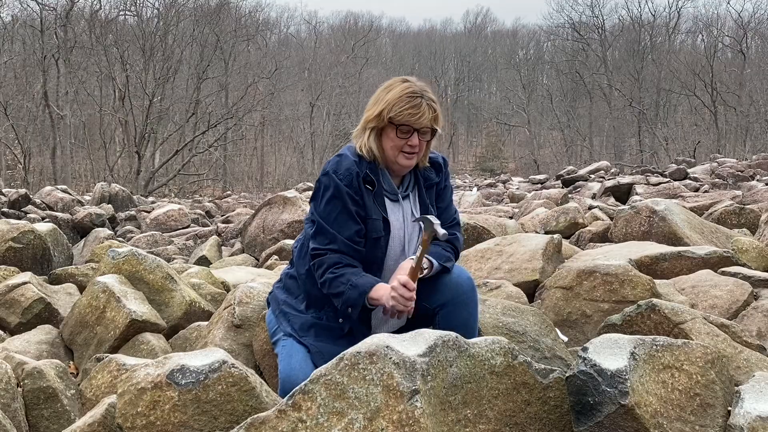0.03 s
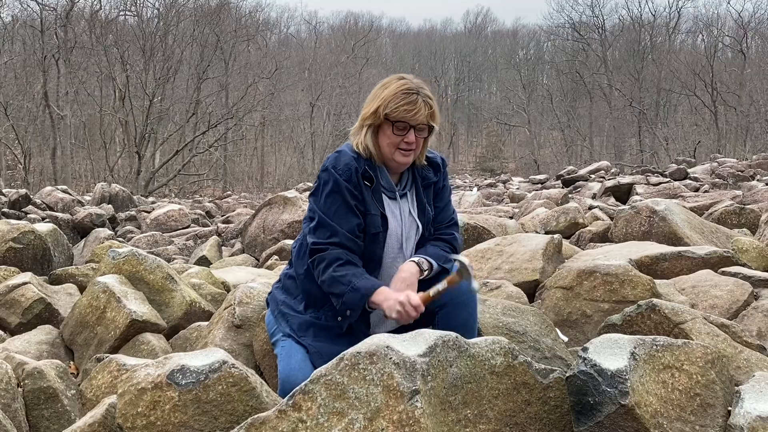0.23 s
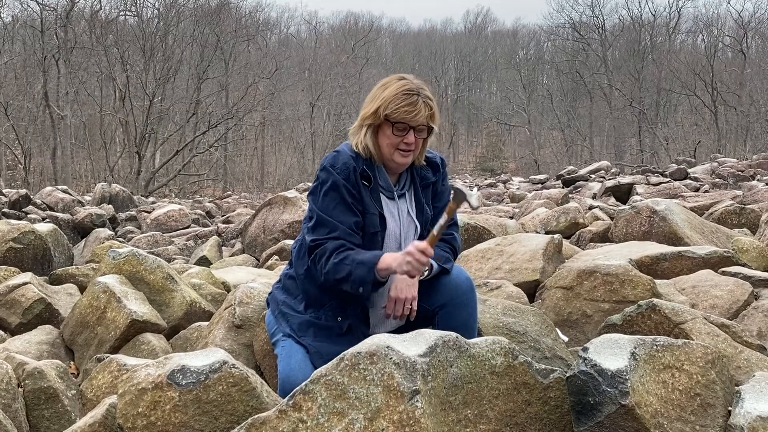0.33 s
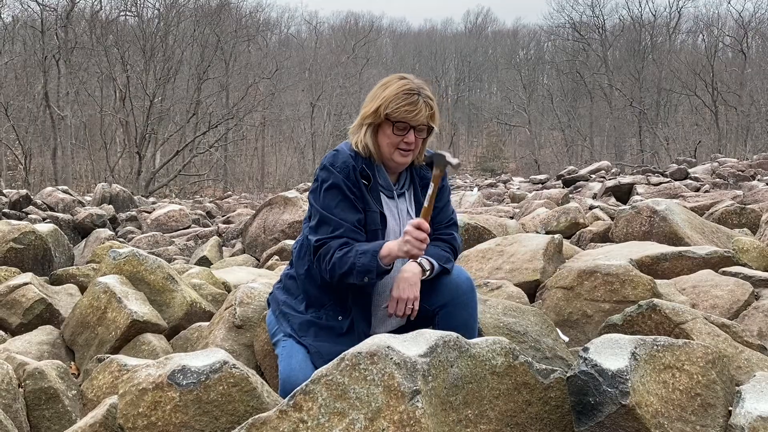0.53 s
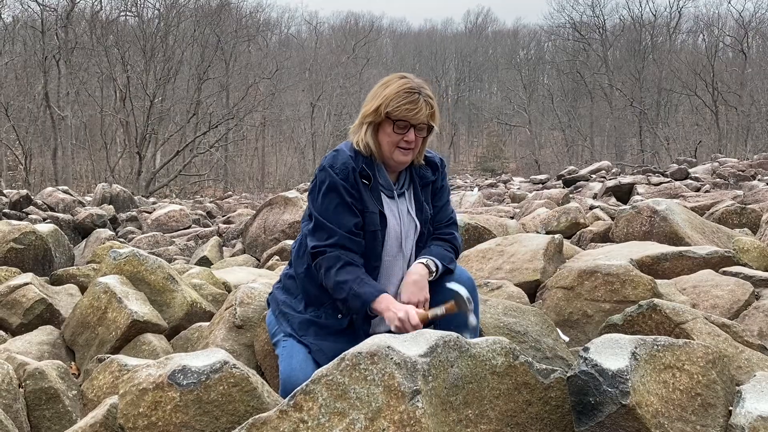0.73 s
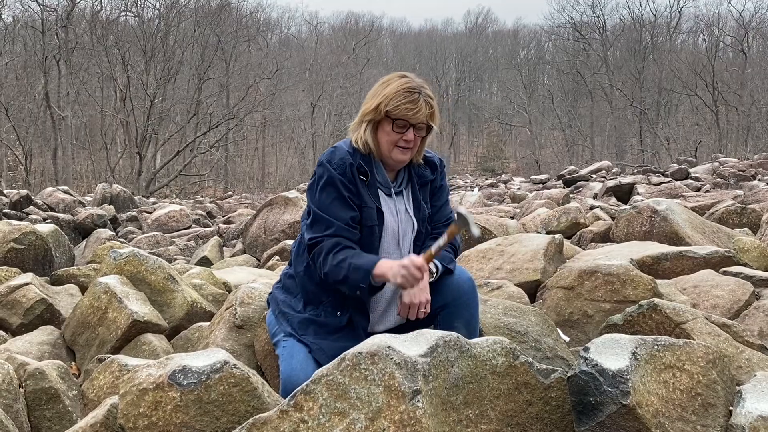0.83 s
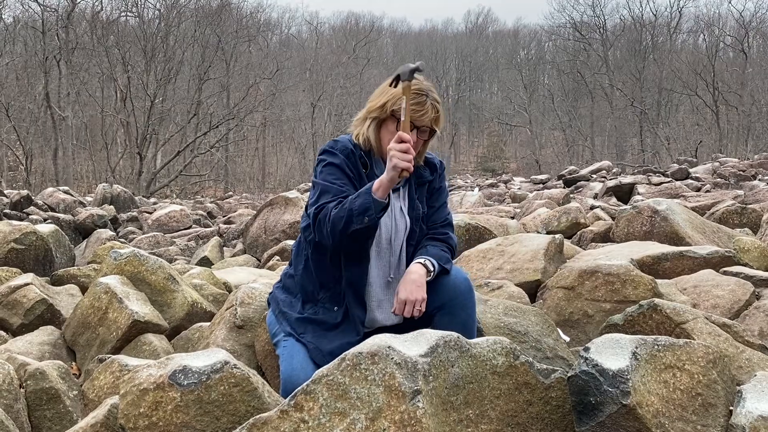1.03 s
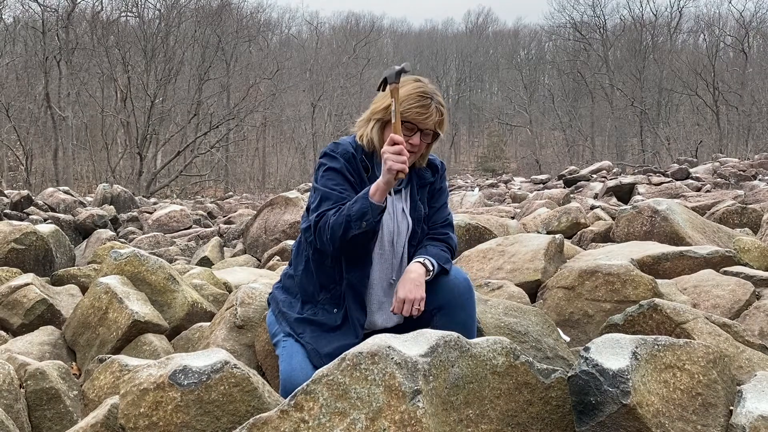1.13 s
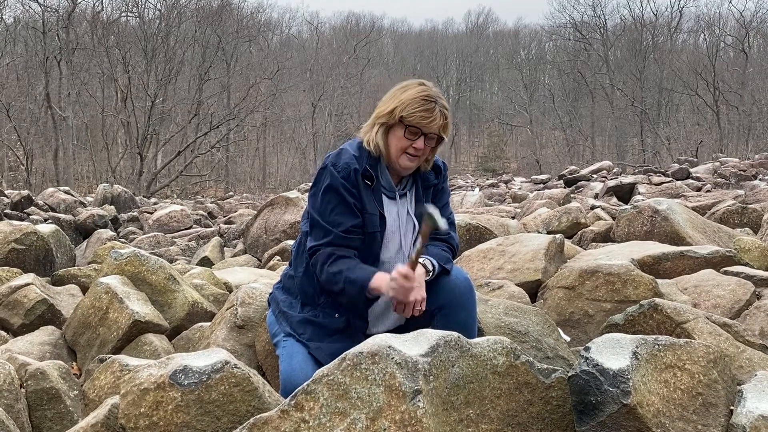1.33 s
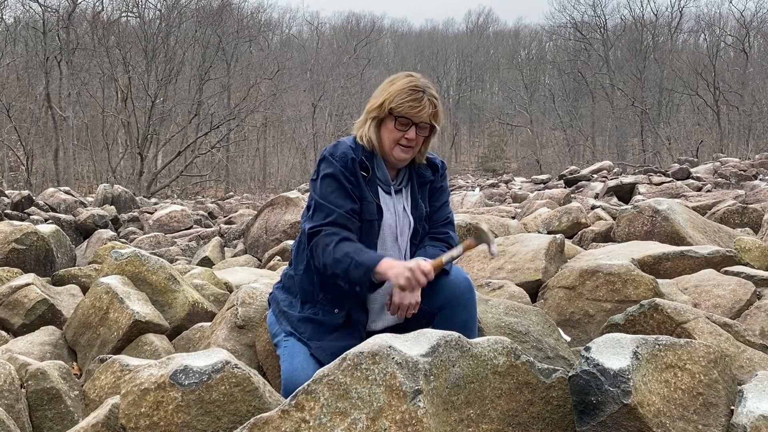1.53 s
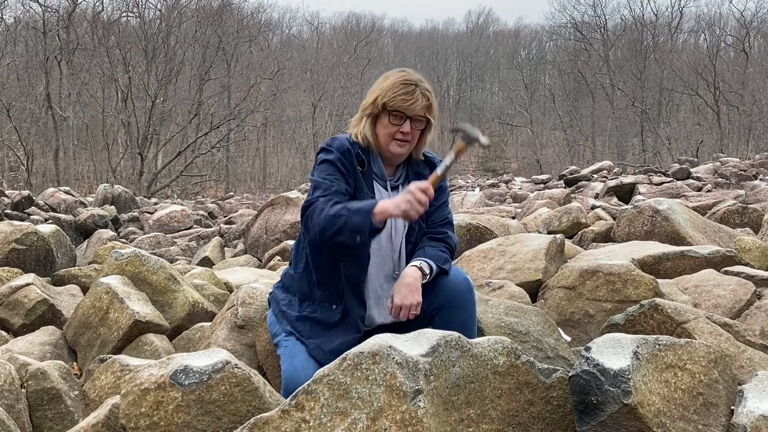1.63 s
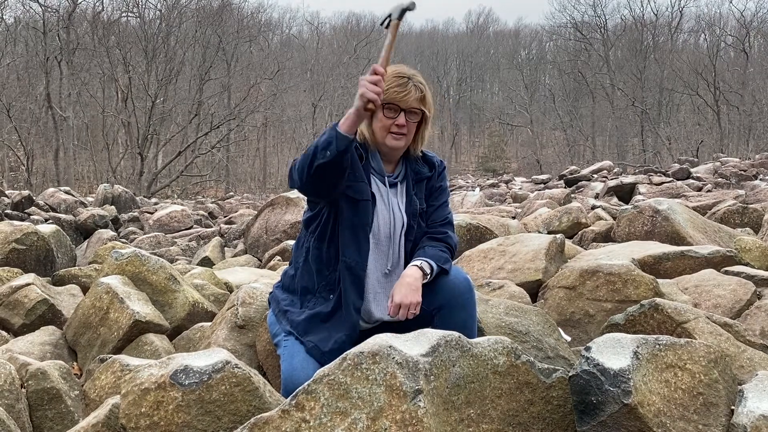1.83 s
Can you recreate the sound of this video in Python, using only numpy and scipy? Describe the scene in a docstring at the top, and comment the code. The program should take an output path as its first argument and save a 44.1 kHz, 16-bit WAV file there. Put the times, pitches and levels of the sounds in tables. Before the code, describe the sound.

A steel hammer strikes a boulder at about 0.2, 0.7 and 1.4 seconds, after the fading ring of an earlier blow. Each hit is a sharp crack with a dull knock and short, high bell-like tones from the rock. The hammer head rings on thinly, bending slightly in pitch. A faint echo returns across the open field over a soft, low rumble of air.

```python
"""Hammer on a ringing boulder

An open field of rocks, a stereo microphone a few metres from a steel hammer striking a boulder.
Each blow cracks, thuds, scatters among the stones and sets the boulder's short bell tones going.
The hammer head sings on as it is lifted and brought down, its motion bending the pitch.
The trees send back a faint echo over a low rumble of air."""
import sys
import numpy as np
from scipy import signal
from scipy.fft import rfft, irfft
from scipy.io import wavfile

SR = 44100
rng = np.random.default_rng(int(sys.argv[2]) if len(sys.argv) > 2 else 0)


def generate_wav(signal):
    """Clip the signal to [-1, 1] and save it as 16-bit WAV at the path in sys.argv[1]."""
    frames = np.transpose(np.atleast_2d(signal))
    scaled = np.clip(frames, -1, 1) * 32767
    pcm = np.round(scaled).astype(np.int16)
    wavfile.write(sys.argv[1], SR, pcm)


N = 83790

# The boulder's modes: pitch_hz, t60_s, spot_a_db, spot_b_db, spot_c_db
BOULDER_MODES = [(770, .045, -22, -24, -23), (1769, .23, -27, -25, -23), (2572, .28, -30, -38, -21),
                 (2742, .31, -40, -42, -34), (3128, .36, -42, -44, -40), (3816, .175, -20, -21, -19),
                 (3983, .25, -23, -22, -19), (4294, .29, -31, -26, -27), (4470, .14, -24, -24, -20),
                 (4922, .32, -29, -26, -26), (5074, .16, -18, -16, -19), (5160, .20, -24, -22, -21),
                 (5423, .13, -34, -39, -27), (5523, .26, -44, -40, -43), (6296, .10, -27, -33, -22),
                 (6557, .16, -40, -33, -45), (6755, .06, -28, -29, -22), (7058, .13, -42, -47, -34)]
def boulder(t, spot):
    """Bell tones of the rock; their balance depends on the spot that is struck."""
    phases = 2 * np.pi * rng.random(len(BOULDER_MODES))
    return sum(amp(spots_db["ABC".index(spot)]) * fade(t, t60) * np.sin(2 * np.pi * hz * t + phase)
               for (hz, t60, *spots_db), phase in zip(BOULDER_MODES, phases))


# Colour of steel on stone: frequency_hz, relative_db
CRACK_SPECTRUM = [(130, -25.5), (500, -12), (820, -2.5), (1150, -7.5), (2200, 0.5), (3300, -1), (4700, 3.5),
                  (6400, 3.5), (8200, -10), (10500, -8.5), (12100, -31), (13400, -10.5), (14900, -13.5),
                  (16000, -22)]
# Decay of its bands: centre_hz, t60_s
CRACK_BANDS = [(400, 0.079), (1000, .028), (5000, 0.036), (15000, 0.061)]
# Its left-right likeness at the microphone: frequency_hz, correlation
CRACK_LIKENESS = [(200, 0.99), (1000, .93), (2500, 0.75), (6000, 1), (13000, .6)]
def crack(t, rise_s=.00033, hold_s=.0035):
    """The burst of the contact holds for a moment, then each band dies at its own speed."""
    hz = np.fft.rfftfreq(N, 1 / SR)
    spectrum = rfft(noise(CRACK_SPECTRUM, CRACK_LIKENESS))
    burst = 0
    for centre_hz, t60 in CRACK_BANDS:
        band = read([(f, f == centre_hz) for f, _ in CRACK_BANDS], hz)
        burst += irfft(spectrum * band, N) * fade(np.maximum(t - hold_s, 0), t60)
    return amp(-14) * np.minimum(t / rise_s, 1) * burst


# The steel head's modes: pitch_hz
HEAD_PITCHES = [4768, 4768, 7308, 8851, 14750]
# The same modes and their reflections: name, base_t60_s, shimmer_db, shimmer_t60_s, flutter_hz
HEAD_MODES = [("clang", 0.051, -29, .12, 40), ("low", 0.57, -1, 0.87, 26), ("high", 3.34, -4.5, 2, 34),
              ("ping", 0.13, -17.5, 0.43, 17), ("top", .25, -2, .33, 35)]
# The swing after each blow; the grip scales the ring time, and two tones swell as they face the
# microphone: lift_s, grip_factor, high_facing_s, low_facing_s, low_width_s, low_swell_db
HAMMER_SWINGS = [(.14, 1.8, 0.17, .2, .06, -2.5), (0.161, 1.26, .23, 0.19, 0.21, 11),
                 (.24, 1.12, .21, .225, .055, 18), (0.342, 0.76, 0.23, .27, .1, 7.5)]
def hammer(t, swing, levels_db):
    """The head rings flat moving away and sharp coming down; its reflections shimmer among the stones."""
    lift_s, grip, high_facing_s, low_facing_s, low_width_s, low_swell_db = swing
    lift_m_per_s, top_m_per_s, drop_m_per_s2, sound_m_per_s = .6, 1.6, 6.5, 343
    approach = np.where(t < lift_s, -lift_m_per_s * t / lift_s,
                        drop_m_per_s2 * (t - lift_s) - lift_m_per_s)
    doppler_s = np.cumsum(1 + np.minimum(approach, top_m_per_s) / sound_m_per_s) / SR
    facing_db = {"low": low_swell_db * np.exp(-((t - low_facing_s) / low_width_s) ** 2),
                 "high": 9.5 * np.exp(-((t - high_facing_s) / .034) ** 2)}
    away_db = 37.5 * np.maximum(t - .28 * grip, 0)  # the raised head turns from the microphone
    tones = 0
    for hz, mode, level_db in zip(HEAD_PITCHES, HEAD_MODES, levels_db):
        name, t60, shimmer_db, shimmer_t60, flutter_hz = mode
        direct = amp(facing_db.get(name, 0) - away_db) * fade(t, t60 * grip)
        shimmer = amp(shimmer_db) * fade(t, shimmer_t60) * flutter(flutter_hz)
        tones += amp(level_db) * ((direct + shimmer) * np.exp(2j * np.pi * hz * doppler_s)).imag
    return tones


# Low modes of the boulder on its bed: pitch_hz, t60_s, level_db
THUD_MODES = [(112, .12, -47), (164, .11, -37.5), (191.5, 0.17, -41), (269, 0.079, -35.5),
              (389, 0.027, -45)]
def thud(t, rise_cycles=1.8):
    """The boulder's dull knock on its bed; the deeper a mode, the later it builds up."""
    return sum(amp(db) * bloom(t, rise_cycles / hz, t60) * np.sin(2 * np.pi * hz * t)
               for hz, t60, db in THUD_MODES)


# Reflections off the nearby stones: frequency_hz, relative_db
STONE_SPECTRUM = [(150, 4.5), (500, -10.5), (1300, -7.5), (2300, 1.5), (4500, 4), (6400, 3), (8200, -14),
                  (10300, -2.5), (12200, -26.5), (14500, -13), (16500, -33.5)]
# Reflections off the trees: frequency_hz, relative_db
TREE_SPECTRUM = [(300, -15), (1250, -3), (2300, 9), (3300, -0.5), (4600, 3.5), (5600, -9), (6400, 11),
                 (7400, -1.5), (8000, -27.5), (10000, -15), (12000, -35.5)]
# Left-right likeness of diffuse sound at the microphone: frequency_hz, correlation
DIFFUSE_LIKENESS = [(50, 1), (300, 0.92), (900, .55), (2300, 0.74), (5000, 0.72), (15000, .5)]
def crack_echo(t):
    """The crack scatters among the stones close by, then returns from the trees farther off."""
    stones = amp(-32.5) * noise(STONE_SPECTRUM, DIFFUSE_LIKENESS) * bloom(t, rise_s=.004, t60=.23)
    trees = amp(-59) * noise(TREE_SPECTRUM, DIFFUSE_LIKENESS) * bloom(t, rise_s=.18, t60=.84)
    return stones + trees


def ring_echo(t, ring, top_hz=6000):
    """A faint, dull, smeared return of the ringing from the edge of the wood."""
    tail = rng.standard_normal((2, N)) * bloom(t, rise_s=.18, t60=.5)
    tail /= np.linalg.norm(tail[0])
    tail = signal.sosfilt(signal.butter(10, top_hz, fs=SR, output="sos"), tail)
    return amp(-27.5) * signal.fftconvolve(ring, tail, axes=1)[:, :N]


# Still air over the field: frequency_hz, relative_db
AIR_SPECTRUM = [(20, -41.5), (32, -15.5), (50, 2), (90, 3), (130, -7.5), (260, -11.5), (380, -21),
                (800, -28.5), (1250, -41), (2300, -24), (3300, -36), (5600, -40), (6500, -38.5),
                (8500, -69), (16000, -81.5)]
# Contour of its low rumble: time_s, relative_db
RUMBLE_CONTOUR = [(0.0, -58.5), (0.111, -48.5), (0.296, -63), (0.528, -50.5), (0.593, -63), (0.618, -53.5),
                  (0.902, -64.5), (0.972, -54), (1.162, -57), (1.334, -51), (1.354, -57.5), (1.9, -55.5)]
def air(t, rumble_top_hz=200, swell_depth=.87):
    """Steady outdoor hush whose low rumble swells and sinks."""
    time_s, db = np.transpose(RUMBLE_CONTOUR)
    swell_db = swell_depth * np.interp(t, time_s, db - db.mean())
    hush = noise(AIR_SPECTRUM, DIFFUSE_LIKENESS)
    rumble = signal.sosfiltfilt(signal.butter(2, rumble_top_hz, fs=SR, output="sos"), hush)
    return amp(-54.5) * (hush + rumble * (amp(swell_db) - 1))


def amp(db):
    """Decibels to gain."""
    return 10 ** (np.asarray(db) / 20)


def fade(t, t60):
    """Exponential decay, 60 dB in t60 seconds."""
    return np.exp(-np.log(1000) * t / t60)


def bloom(t, rise_s, t60):
    """Swells for rise_s, then dies away."""
    return np.minimum(t / rise_s, 1) * fade(np.maximum(t - rise_s, 0), t60)


def read(points, hz):
    """Reads a table on a log-frequency axis."""
    f, value = np.transpose(points)
    return np.interp(np.log(hz + 1), np.log(f + 1), value)


def noise(spectrum, likeness):
    """Stereo noise of level 1 with a given colour and left-right likeness."""
    hz = np.fft.rfftfreq(N, 1 / SR)
    mid, side = rfft(rng.standard_normal((2, N)))
    correlation = read(likeness, hz)
    mid, side = mid * np.sqrt(1 + correlation), side * np.sqrt(1 - correlation)
    stereo = irfft(np.array([mid + side, mid - side]) * amp(read(spectrum, hz)), N)
    return stereo / stereo.std()


def flutter(rate_hz):
    """Slow random wavering of size and phase, level 1."""
    white = rng.standard_normal(N) + 1j * rng.standard_normal(N)
    waver = np.fft.ifft(white * np.exp(-(np.fft.fftfreq(N, 1 / SR) / rate_hz) ** 2 / 2))
    return waver / waver.std()


def add(mix, start_s, sound):
    """Mixes a sound in at start_s; one that starts before zero leaves only its tail."""
    at = round(start_s * SR)
    sound = sound[..., max(-at, 0):]
    part = mix[:, max(at, 0):][:, :sound.shape[-1]]
    part += sound[..., :part.shape[1]]


# The blows, ending with the head's five tones:
# start_s, boulder_spot, knock_gain_db, clang_db, low_db, high_db, ping_db, top_db
HAMMER_BLOWS = [(-.095, "B", 2.5, -9, -48, -48, -48.5, -69.5), (0.199, "A", 1, -4, -33, -36.5, -22, -61.5),
                (0.7197, "B", 2.5, -8, -33.5, -40.5, -33.5, -33.5),
                (1.3985, "C", 1.5, -13, -36, -40, -46.5, -61.5)]
def scene(contact_s=.001):
    """Blows and echoes in the open field; each new contact stops the hammer's earlier ringing."""
    t = np.arange(N) / SR
    ring, knocks = np.zeros((2, 2, N))
    ends_s = [blow[0] for blow in HAMMER_BLOWS[1:]] + [np.inf]
    for (start_s, spot, knock_db, *head_db), swing, end_s in zip(HAMMER_BLOWS, HAMMER_SWINGS, ends_s):
        head_free = np.clip((end_s - start_s - t) / contact_s + 1, 0, 1)
        tones = boulder(t, spot) + head_free * hammer(t, swing, head_db)
        add(ring, start_s, np.minimum(t / contact_s, 1) * tones)
        add(knocks, start_s, amp(knock_db) * (crack(t) + thud(t) + crack_echo(t)))
    return ring + ring_echo(t, ring) + knocks + air(t)


# Phase between the microphone's two ports: frequency_hz, left_lead_rad
PORT_PHASE = [(1200, 0), (1770, -.4), (2570, .15), (3800, .5), (4800, .5), (6300, 0), (7310, -1),
              (7700, -1), (8500, 2), (9200, 2), (10300, 1), (14700, -1.3)]
def record(dry, ceiling=.75, top_hz=16000):
    """The microphone: phase between its two ports, soft overload on the peaks, then the band limit."""
    lead = read(PORT_PHASE, np.fft.rfftfreq(2 * N, 1 / SR))
    ports = irfft(rfft(dry, 2 * N) * np.exp(.5j * np.array([lead, -lead])), 2 * N)[:, :N]
    squashed = ports / (1 + (ports / ceiling) ** 4) ** (1 / 4)
    lowpass = signal.firwin(511, top_hz, window=("kaiser", 9), fs=SR)
    return signal.oaconvolve(squashed, lowpass[None], "same")


dry = scene()
out = record(dry)
generate_wav(out)
```